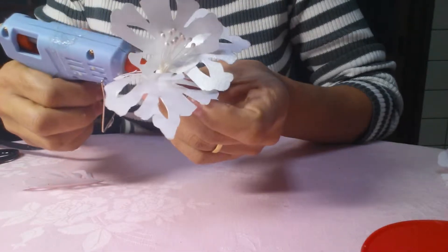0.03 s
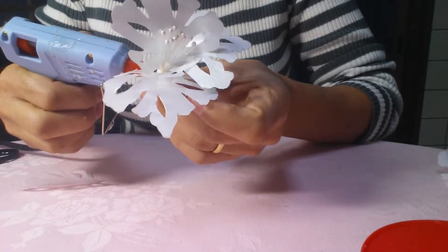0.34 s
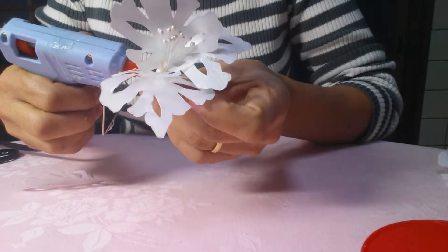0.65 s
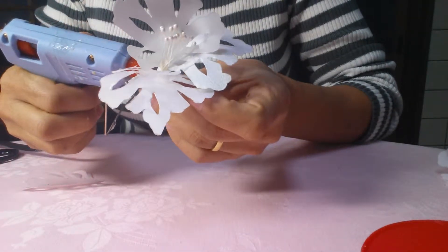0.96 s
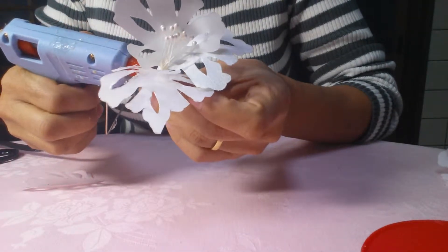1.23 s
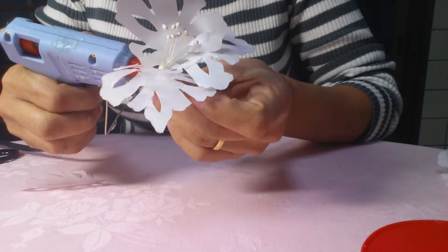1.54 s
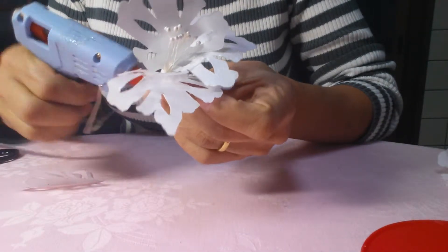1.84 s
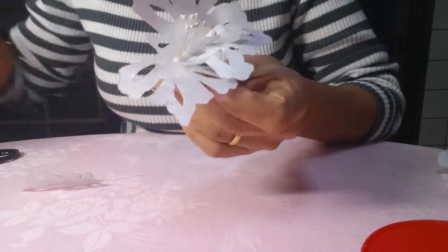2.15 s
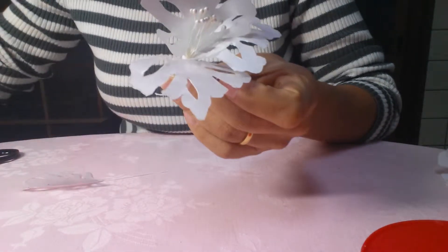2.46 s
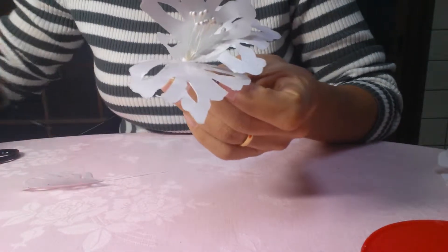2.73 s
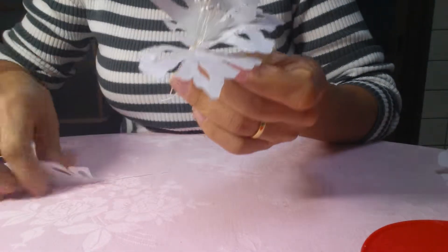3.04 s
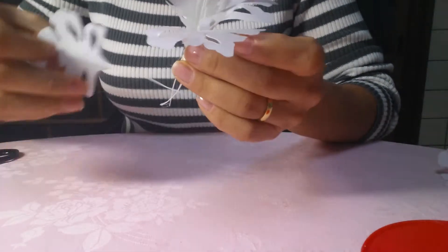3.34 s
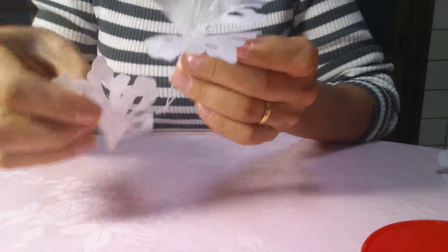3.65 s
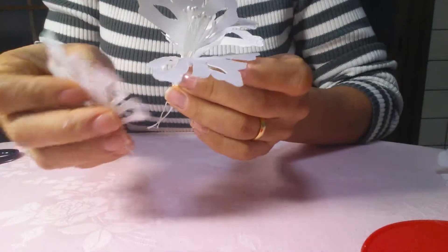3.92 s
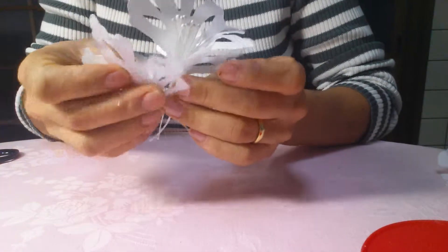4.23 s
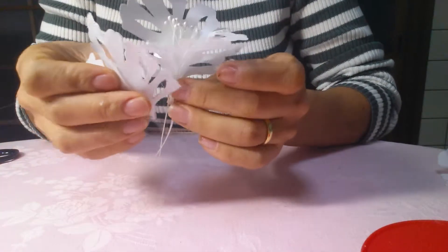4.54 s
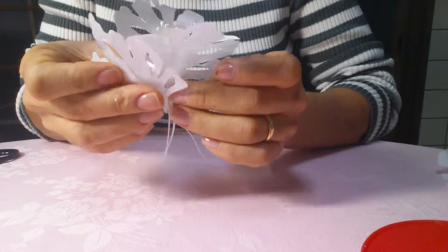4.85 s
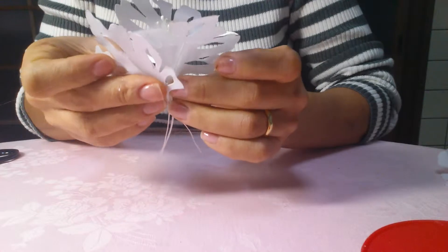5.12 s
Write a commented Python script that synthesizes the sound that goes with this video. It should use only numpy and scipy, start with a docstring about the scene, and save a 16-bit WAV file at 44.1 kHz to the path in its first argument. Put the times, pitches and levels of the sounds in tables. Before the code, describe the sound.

A hot-glue gun's plastic trigger ticks irregularly as it is squeezed, then creaks and springs back with a sharp crack. The gun is set on a table with a few thuds and clacks, its metal rest ringing and scraping briefly. A hand brushes the tablecloth, and stiff satin petals pop faintly. The microphone is close, in a small, hard room with low rumble, hum and hiss.

```python
"""A hot-glue gun's plastic trigger ticks close to a phone, at a table in a small, hard room.
Each slip of the glue feed knocks the hollow shell; the trigger creaks, then springs back with a crack.
The gun is set down: the table thuds, the plastic clacks, the metal rest rings and scrapes.
A hand brushes the tablecloth, and creases in stiff satin petals pop faintly.
Under it all lie room rumble, a low hum and microphone hiss."""
import sys
import numpy as np
from scipy import signal
from scipy.fft import rfft, irfft, next_fast_len
from scipy.io import wavfile
from scipy.ndimage import uniform_filter1d, map_coordinates

SR = 44100
rng = np.random.default_rng(int(sys.argv[2]) if len(sys.argv) > 2 else 0)


def output_pcm(signal):
    """Save a mono or channel-first signal as 16-bit PCM at the path in sys.argv[1].

    Samples are clipped to [-1, 1] before scaling.
    """
    pcm = np.clip(np.atleast_2d(signal).T, -1, 1) * 32767
    wavfile.write(sys.argv[1], SR, np.round(pcm).astype(np.int16))


N = 228377
TIME_S = np.arange(N) / SR
AGE_S = np.arange(SR // 2) / SR  # since a contact
LEAD_S, CLICK_S = 0.002, 0.002  # run-up to a slip; duration that sets a click's energy

# microphone port imbalance, near sounds: freq_hz, left_minus_right_db
NEAR_BALANCE = [(200, -2), (1100, 2), (3000, 7.5), (4000, 8.5), (5800, 17), (7200, 18), (8600, -3),
                (14000, -4.5)]
# port imbalance, hiss: freq_hz, left_minus_right_db
HISS_BALANCE = [(1000, -8.5), (4400, 3), (8100, -8), (15000, -12.5)]
# diffuse field, left to right: freq_hz, coherence
COHERENCE = [(60, 0.93), (180, 0.95), (400, 0.71), (900, 0), (2000, 0.011)]
# room decay: freq_hz, t60_s
ROOM_DECAY = [(150, 0.37), (800, 0.3), (2100, 0.3), (5500, 0.32), (9000, 0.33), (14000, 0.2)]
# hum partials: pitch_hz, rms_db
HUM_PARTIALS = [(59.5, -73.5), (119.5, -67.5), (153, -64), (184.5, -65), (517, -77.5), (1137, -81)]

# spectra: freq_hz, density_db
ROOM_SPECTRUM = [(100, -1), (600, 2), (1100, -5.5), (2200, 1), (4000, 6), (6500, -1), (10000, 5),
                 (14000, -3)]  # reverberation
RUMBLE_SPECTRUM = [(25, -44.5), (36, -7.5), (48, -18.5), (90, -21.5), (115, -10.5), (150, -1), (172, -18.5),
                   (225, -9), (340, -14.5), (410, -20.5), (520, -14), (660, -24.5), (1000, -26.5),
                   (1700, -33), (4000, -37)]  # room
HISS_SPECTRUM = [(1800, -4), (4500, -2.5), (5100, -1.5), (5250, 6), (5450, 0), (6400, .5), (7500, 0),
                 (9500, 2.5), (14500, -3.5)]  # microphones
SATIN_SPECTRUM = [(250, 1.5), (600, 2), (1100, 4.5), (2000, -12.5), (3300, -7), (4500, -2.5), (6000, 4.5),
                  (8000, -13), (14000, -17)]  # popping crease
SWISH_SPECTRUM = [(150, -17), (420, -14.5), (800, 0.5), (1100, 1.5), (2500, -7.5), (4000, -13.5),
                  (6000, -4), (9000, -15.5), (14000, -23.5)]  # rubbed cloth
TABLE_SPECTRUM = [(20, -20), (45, -12), (110, 1), (200, 3), (330, -3), (520, -5.5), (800, -7.5),
                  (1600, -47)]  # table top
BODY_SPECTRUM = [(200, -28), (540, -7.5), (650, -23), (790, 7), (960, -15.5), (1200, 7), (1480, -8),
                 (1700, 8.5), (2000, -15), (2500, -1.5), (3200, -11.5), (5700, -10), (8000, -19),
                 (14000, -33.5)]  # gun body landing
SPRING_SPECTRUM = [(300, -17.5), (550, -29.5), (800, 2.5), (1600, 4), (2050, -8.5), (2600, -2),
                   (3300, -12.5), (4500, -7.5), (6300, 2), (8500, -14.5), (11000, -16.5), (14500, -30)]  # spring letting go
SHELL_SPECTRUM = [(300, -21), (650, -19.5), (880, -7.5), (1150, 2.5), (1550, -6), (2050, 2), (2550, -3),
                  (3200, -11.5), (6000, -35)]  # hollow shell
TRIGGER_SPECTRUM = [(1500, -21.5), (3300, -17.5), (4300, -3.5), (4900, -10.5), (6000, 1), (6900, -4),
                    (8000, -7), (10500, -14), (14500, -21.5)]  # trigger snap

# main satin creases popping: start_s, level_db
CREASE_POPS = [(4.138, -49), (4.1774, -41), (4.1979, -48), (4.309, -45.5), (4.6732, -53), (4.72, -48.5),
               (4.7965, -46.5), (4.828, -49.5), (4.8847, -53.5)]
# soft bumps and rubs of gun or hand on the table: start_s, length_s, level_db
TABLE_BUMPS_AND_RUBS = [(0.108, 0.027, -54), (2.436, 0.074, -40), (2.64, 0.07, -40.5), (2.7, 0.23, -49.5),
                        (3.03, 0.18, -48), (4.305, 0.013, -58)]
# sleeve and satin sweeping as the arm moves: start_s, length_s, level_db
CLOTH_SWEEPS = [(1.968, 0.057, -49.5), (2.091, 0.2, -48), (2.299, 0.14, -47.5), (3.7, 0.26, -67.5)]
# modes of the gun's metal rest: pitch_hz, level_db, t60_s
REST_MODES = [(2313, -4, .14), (2369, -1.5, .14), (2750, -10, .11), (3578, -9, .16), (3614, -11, .12),
              (4085, -12, .15), (4916, -4.5, .09), (5175, -7, .11), (5577, 2, .08), (5905, -8, .06),
              (7150, -11, .05), (8005, -14, .05), (8784, -5, .07), (10505, -10, .07), (12400, -14, .05)]
# gun landing and settling: start_s, rise_s, thud_db, clack_db, ring_db, best_ring_hz
LANDINGS = [(2.4478, 0.002, -53.5, -39, -43.5, 2500), (2.5196, 0.00083, -51, -29.5, -30, 3540),
            (2.605, 0.0032, -36, -22, -25, 2390), (2.733, 0.0028, -58, -43, -70, 2333),
            (2.774, 0.0016, -48, -51, -44.5, 2800), (2.876, 0.0032, -33.5, -30, -23, 7400)]
# trigger creaks, even and duller slips: start_s, length_s, shell_db
TRIGGER_CREAKS = [(0.3195, 0.012, -44.5), (0.607, 0.005, -43), (2.1334, 0.09, -35)]
# glue feed ticks: start_s, snap_db
FEED_TICKS = [(0.03, -28.5), (0.0678, -31.5), (0.4832, -27.5), (0.6116, -34), (0.6558, -30),
              (0.7437, -29.5), (0.8727, -28.5), (1.0004, -27.5), (1.1318, -24.5), (1.1916, -23),
              (1.2973, -21.5), (1.9874, -29), (2.0177, -28.5), (2.1185, -26.5)]


def amp(db):
    """Decibels to gain."""
    return 10 ** (np.asarray(db) / 20)


def unit(x):
    """x at rms 1."""
    return x / np.sqrt(np.mean(x ** 2) + 1e-20)


def with_energy(x, length_s):
    """x with the energy of rms 1 held for length_s."""
    return x * np.sqrt(length_s * SR / (np.sum(x ** 2) + 1e-20))


def curve(points, hz):
    """(freq_hz, value) points read on a log axis."""
    freq_hz, values = np.transpose(points)
    return np.interp(np.log(hz + 1), np.log(freq_hz + 1), values)


def filtered(x, response):
    """x through a frequency response."""
    n = x.shape[-1]
    padded = next_fast_len(n + 8192)
    return irfft(rfft(x, padded) * response(np.fft.rfftfreq(padded, 1 / SR)), padded)[..., :n]


def noise(spectrum, size):
    """Coloured noise at rms 1."""
    return unit(filtered(rng.standard_normal(size), lambda hz: amp(curve(spectrum, hz))))


def pan(db):
    """Constant-power left and right gains for a level difference."""
    gains = amp([db / 2, -db / 2])
    return gains / np.sqrt(np.mean(gains ** 2, axis=0))


def add(track, start_s, x):
    """Mix x into the track."""
    start = max(round(start_s * SR), 0)
    track[:, start:start + x.shape[-1]] += x[:, :N - start]


def diffuse(pair):
    """Two unrelated signals as a room delivers them: alike in the bass only."""
    angle = lambda hz: np.arccos(np.clip(curve(COHERENCE, hz), -1, 1)) / 2
    mid, side = filtered(pair, lambda hz: np.array([np.cos(angle(hz)), np.sin(angle(hz))]))
    return np.array([mid + side, mid - side])


def direct(x, lag_s):
    """Near sound reaches the right port lag_s late and, in most bands, weaker."""
    delay_s = np.array([[0], [lag_s]])
    return filtered(x, lambda hz: pan(curve(NEAR_BALANCE, hz)) * np.exp(-2j * np.pi * hz * delay_s))


def reverb(x, gap_s=0.0031, build_s=0.0065, pan_db=1.0):
    """The walls answer after a gap; each frequency dies at its own rate."""
    hz, t, bins = signal.stft(rng.standard_normal((2, len(AGE_S))), SR, nperseg=256)
    decay_db = -60 * t / curve(ROOM_DECAY, hz)[:, None]
    bins *= amp(decay_db + curve(ROOM_SPECTRUM, hz)[:, None])
    tail = signal.istft(bins, SR, nperseg=256)[1][:, :len(AGE_S)]
    tail = diffuse(tail) * np.clip((AGE_S - gap_s) / build_s, 0, 1)
    tail *= pan(pan_db)[:, None] / np.linalg.norm(tail[0])
    return signal.fftconvolve(x[None], tail, axes=1)[:, :len(x)]


def in_room(x, wet_db, lag_s):
    """Direct sound plus reverberation."""
    return direct(x, lag_s) + amp(wet_db) * reverb(x)


def click(spectrum, smear_s):
    """One blow through a body's spectrum; each frequency leaves up to smear_s late."""
    hz = np.fft.rfftfreq(len(AGE_S), 1 / SR)
    log_gain = np.log(amp(curve(spectrum, hz * rng.uniform(.96, 1.04))))
    cepstrum = irfft(log_gain)[:len(AGE_S) // 2]
    cepstrum[1:] *= 2  # folding makes it causal
    delay_s = smear_s * np.interp(hz, np.linspace(0, SR / 2, 32), rng.random(32))
    return irfft(np.exp(rfft(cepstrum, len(AGE_S)) - 2j * np.pi * np.cumsum(delay_s) * hz[1]))


def slip(blow, grit_db=-3, grit_s=0.0011, skid_db=-12, skid_s=0.0062):
    """A clean break, LEAD_S in, amid finer catches, then a short skid."""
    t = AGE_S[:SR // 60] - LEAD_S
    grit, skid = rng.standard_normal((2, len(t)))
    force = amp(grit_db) * unit(grit * np.exp(-(t / grit_s) ** 2))
    force += amp(skid_db) * unit(skid * np.exp(-np.abs(t) / skid_s))
    force[np.argmin(np.abs(t))] += np.sqrt(len(t))  # the break
    return with_energy(signal.fftconvolve(blow, force)[:len(blow)], CLICK_S)


def strokes(rows):
    """Gain envelope; each stroke swells and fades in one arch."""
    return sum(amp(db) * np.sqrt(np.abs(np.sin(np.pi * np.clip((TIME_S - start_s) / length_s, 0, 1))))
               for start_s, length_s, db in rows)


def background(rumble_db=-58.5, hiss_db=-63.2, waver_rad=0.2):
    """Room rumble, microphone hiss and a slightly wavering hum."""
    rumble = unit(diffuse(noise(RUMBLE_SPECTRUM, (2, N))))
    hiss = filtered(noise(HISS_SPECTRUM, (2, N)), lambda hz: pan(curve(HISS_BALANCE, hz)))
    drift = lambda: map_coordinates(rng.standard_normal(32), [TIME_S * 4])
    hum = sum(amp(db) * np.sqrt(2) * np.sin(2 * np.pi * hz * TIME_S + waver_rad * drift())
              for hz, db in HUM_PARTIALS)
    return amp(rumble_db) * rumble + amp(hiss_db) * hiss + hum


def petals(neighbour_lag_s=0.009, neighbour_db=-55.5):
    """Each satin crease gives way thread by thread and tugs a neighbour into a faint pop."""
    out = np.zeros((2, N))
    scatter = rng.standard_normal((len(CREASE_POPS), 2))
    neighbours = [(start_s + neighbour_lag_s * np.exp(0.26 * late), neighbour_db + 2 * loud)
                  for (start_s, _), (late, loud) in zip(CREASE_POPS, scatter)]
    for start_s, db in CREASE_POPS + neighbours:
        blow = click(SATIN_SPECTRUM, smear_s=0.00188)
        pop = slip(blow, grit_db=1.5, grit_s=0.0008, skid_db=2, skid_s=0.003)
        add(out, start_s - LEAD_S, in_room(amp(db) * pop, wet_db=-6, lag_s=0))
    return out


def rest_ring(best_hz, scatter_db=7.0, loss_db_per_octave=8.5):
    """The metal rest's modes vary with each contact; those near best_hz are favoured."""
    hz, db, t60_s = np.transpose(REST_MODES)[:, :, None]
    scatter, phase = rng.standard_normal((2, len(hz), 1))
    loss_db = loss_db_per_octave * np.abs(np.log2(hz / best_hz))
    gain = amp(db + scatter_db * scatter - loss_db - 60 * AGE_S / t60_s)
    return np.sum(gain * np.sin(2 * np.pi * (hz * AGE_S + phase)), axis=0)


def bumps_and_rubs(swish_db=-2.5, grain_db=3, scrape_db=-16.5, scrape_half_s=0.054, glancing_s=0.0027):
    """Bumps and rubs rumble the table and swish the cloth; the rest scrapes more in a slower landing."""
    contact_gain = strokes(TABLE_BUMPS_AND_RUBS)
    swish_gain = amp(swish_db) * contact_gain + strokes(CLOTH_SWEEPS)
    scrape_gain = np.zeros(N)
    for start_s, rise_s, _, _, ring_db, _ in LANDINGS:
        arch = strokes([(start_s - scrape_half_s, 2 * scrape_half_s, ring_db + scrape_db)])
        scrape_gain += rise_s / glancing_s * arch
    grain = unit(amp(grain_db * unit(uniform_filter1d(rng.standard_normal(N), size=90))))
    metal = unit(signal.fftconvolve(rng.standard_normal(N), rest_ring(best_hz=4500, scatter_db=2))[:N])
    table = contact_gain * noise(TABLE_SPECTRUM, N)
    cloth = swish_gain * grain * noise(SWISH_SPECTRUM, N)
    return in_room(table + cloth + scrape_gain * metal, wet_db=-3, lag_s=0.0004)


def knocks(thud_decay_s=0.013, chatter_depth=1.1, chatter_decay_s=0.0053):
    """The gun lands: the table thuds, the plastic clacks, the metal rest chatters on it and rings."""
    out = np.zeros((2, N))
    for start_s, rise_s, thud_db, clack_db, ring_db, best_hz in LANDINGS:
        onset = 1 - np.exp(-(AGE_S / rise_s) ** 2)
        thud = noise(TABLE_SPECTRUM, len(AGE_S)) * np.exp(-AGE_S / thud_decay_s)
        clack_decay_s = 0.017 * np.sqrt(rise_s / 0.0065)
        clack = noise(BODY_SPECTRUM, len(AGE_S)) * np.exp(-AGE_S / clack_decay_s)
        chatter = 1 + unit(uniform_filter1d(rng.standard_normal(len(AGE_S)), size=70))
        metal = rest_ring(best_hz) * (1 + chatter_depth * chatter * np.exp(-AGE_S / chatter_decay_s))
        parts = [(thud_db, thud), (clack_db, clack), (ring_db, metal)]
        blow = sum(amp(db) * with_energy(onset * part, length_s=0.03) for db, part in parts)
        add(out, start_s, in_room(blow, wet_db=-5, lag_s=0.000364))
    return out


def spring_release(start_s=2.2768, level_db=-13.0, wet_db=-1):
    """The trigger springs back with one broad crack that fills the room."""
    out = np.zeros((2, N))
    crack = with_energy(click(SPRING_SPECTRUM, smear_s=0.002), CLICK_S)
    add(out, start_s - LEAD_S, direct(slip(crack, grit_db=-7), lag_s=0.00036))
    add(out, start_s, amp(wet_db) * reverb(crack))
    return amp(level_db) * out


def feed_slips(shell_db=-28, lift_s=1.8, fade_db_per_s=29.5, creak_gap_s=0.0257, creak_snap_db=-2):
    """Tick and creak slips as start_s, shell_db, snap_db; the ticks' knock fades as the gun lifts away."""
    ticks = [(start_s, shell_db - fade_db_per_s * max(start_s - lift_s, 0), snap_db)
             for start_s, snap_db in FEED_TICKS]
    creaks = [(slip_s, db, db + creak_snap_db) for start_s, length_s, db in TRIGGER_CREAKS
              for slip_s in np.arange(start_s, start_s + length_s, creak_gap_s)]
    return ticks + creaks


def trigger(smear_s=0.0014, wet_db=-11.0):
    """Each slip of the glue feed knocks the hollow shell and snaps the trigger."""
    out = np.zeros((2, N))
    for start_s, shell_db, snap_db in feed_slips():
        parts = [(shell_db, click(SHELL_SPECTRUM, smear_s)), (snap_db, click(TRIGGER_SPECTRUM, smear_s))]
        tick = sum(amp(db) * slip(blow) for db, blow in parts)
        # the room gathers sound from all sides, evening out its colour
        all_round = sum(amp(db) * with_energy(blow, CLICK_S) for db, blow in parts)
        add(out, start_s - LEAD_S, direct(tick, lag_s=0.0002))
        add(out, start_s, amp(wet_db) * reverb(all_round))
    return out


def scene():
    """Everything at the table, in stereo."""
    return trigger() + spring_release() + knocks() + bumps_and_rubs() + petals() + background()


def record(dry):
    """The phone drops the deepest bass and everything above its band limit."""
    low_hz, top_hz = 31, 14650
    return filtered(dry, lambda hz: (1 - np.exp(-(hz / low_hz) ** 6)) / (1 + (hz / top_hz) ** 160))


dry = scene()
out = record(dry)
output_pcm(out)
```